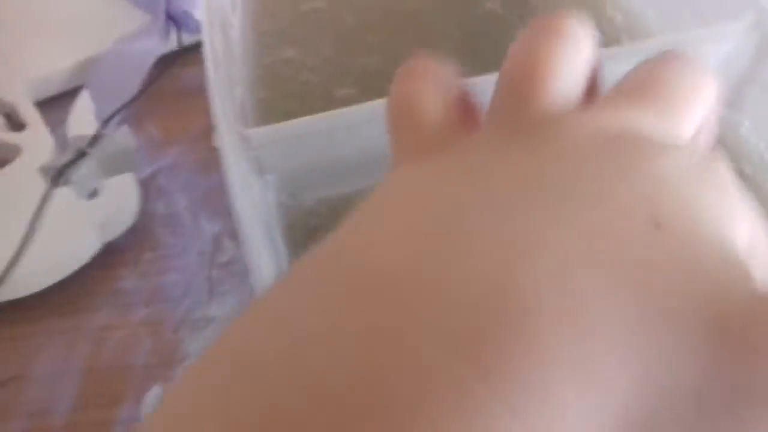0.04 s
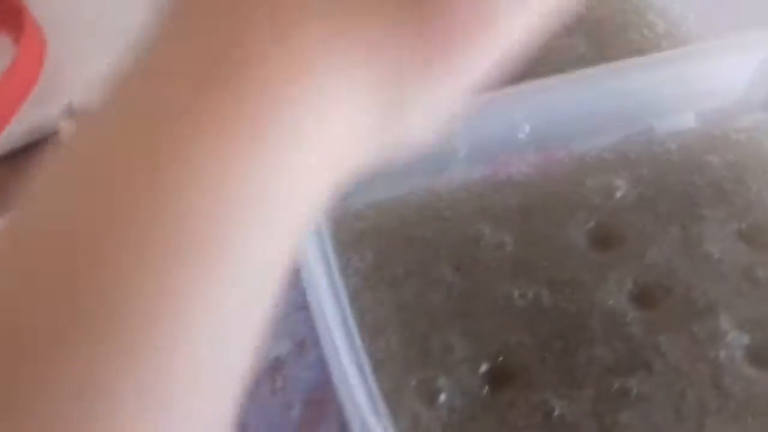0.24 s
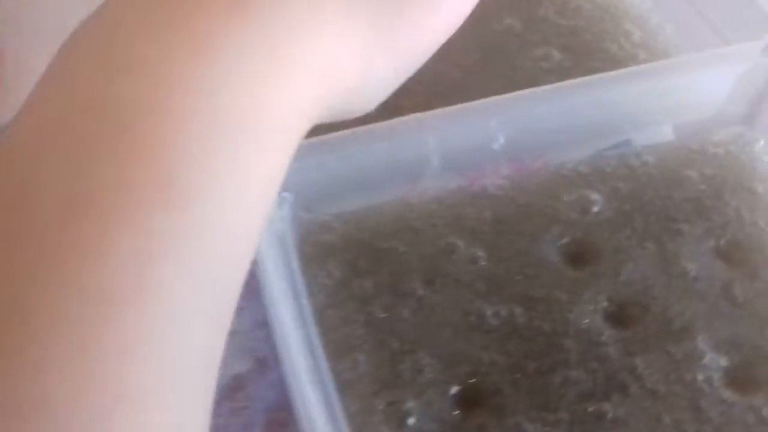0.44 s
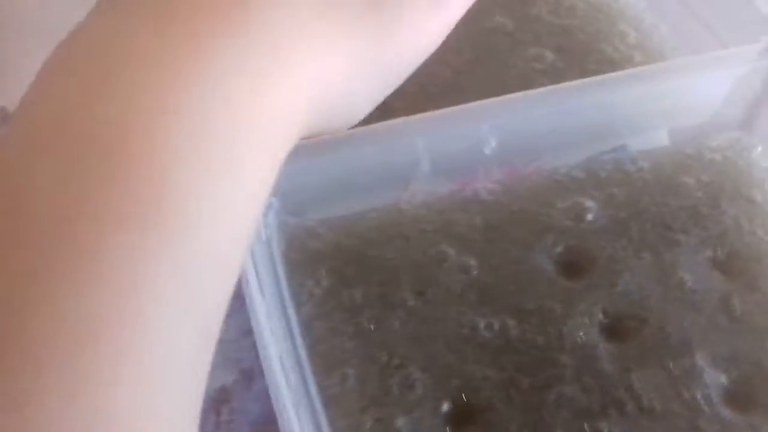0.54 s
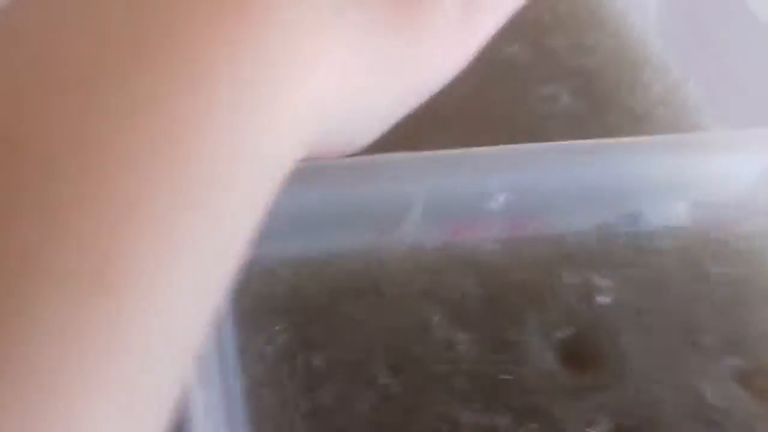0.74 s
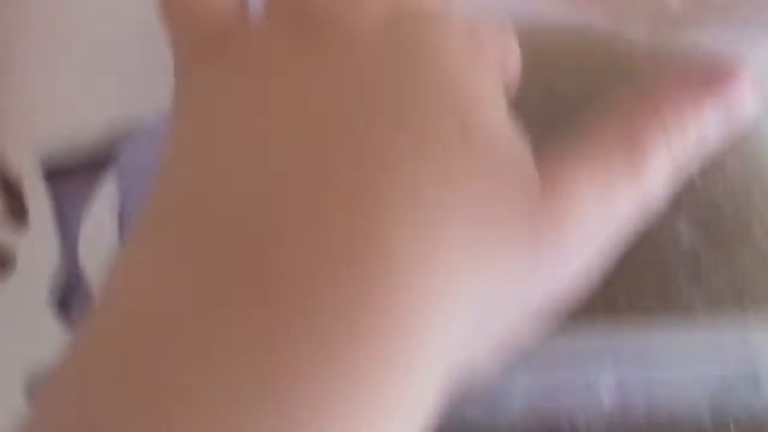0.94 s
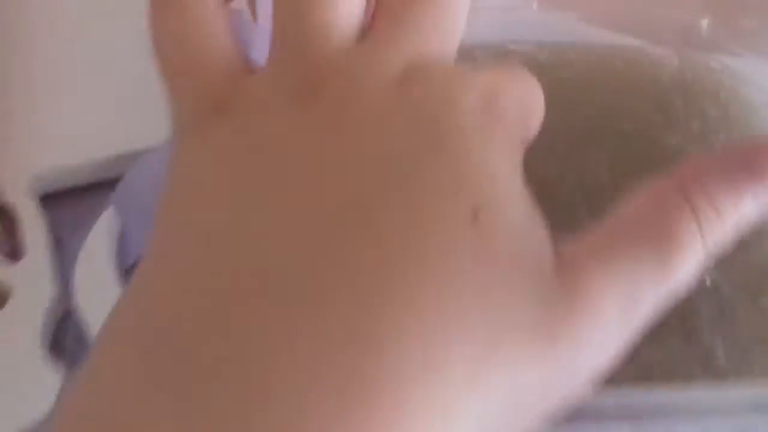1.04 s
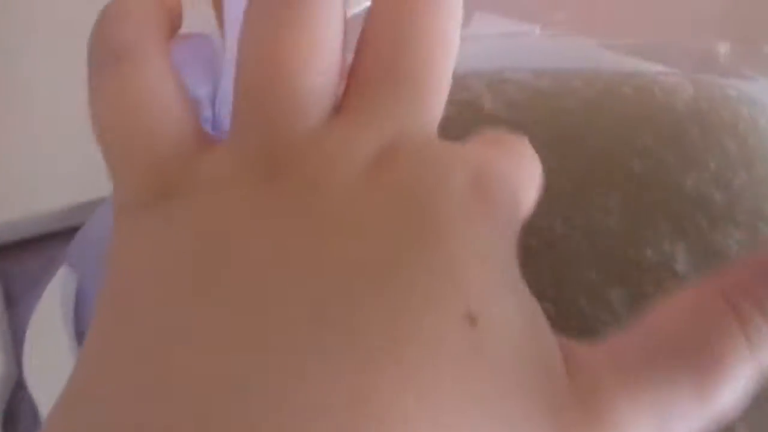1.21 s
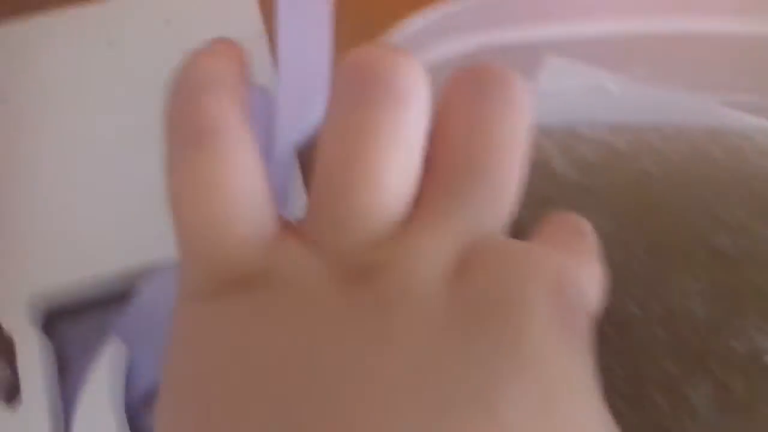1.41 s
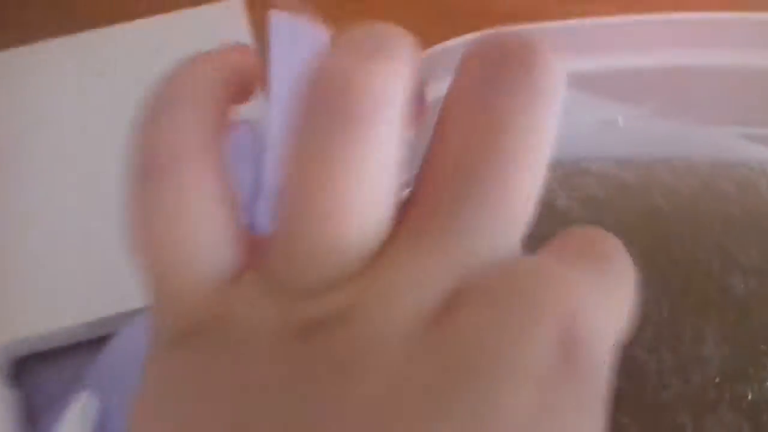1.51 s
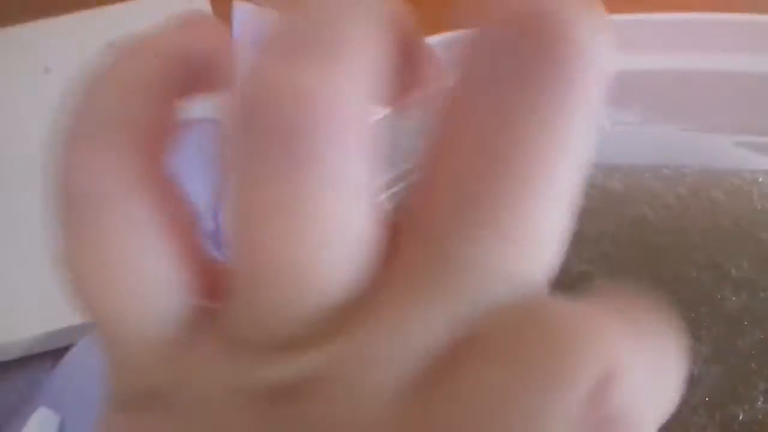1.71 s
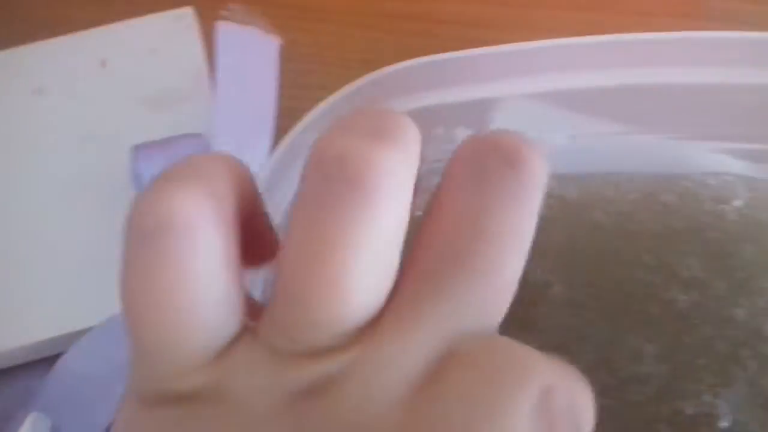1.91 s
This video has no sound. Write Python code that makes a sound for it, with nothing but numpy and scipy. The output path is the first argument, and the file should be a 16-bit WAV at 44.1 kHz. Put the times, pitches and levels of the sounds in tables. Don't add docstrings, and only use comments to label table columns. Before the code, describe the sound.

Slime poked in a plastic tub, very close and dry. Faint clicks at 0.13 s lead to one loud, bright wet snap at 0.17 s with a short hollow tub knock. Near-silence follows, only hiss and low room murmur, with tiny ticks around 1.1-1.4 s. A faint scrape swells near 1.55 s; softer pops and dull table knocks cluster at 1.59-1.69 s, then a weak scrape and faint thud near 1.86 s.

```python
import sys
import numpy as np
from scipy import signal
from scipy.fft import rfft, irfft
from scipy.io import wavfile
from scipy.ndimage import uniform_filter1d

SR = 44100
rng = np.random.default_rng(int(sys.argv[2]) if len(sys.argv) > 2 else 0)


def wav_record(signal):
    frames = np.transpose(np.atleast_2d(signal))
    bounded = np.clip(frames, -1, 1)
    quanta = np.round(bounded * 32767).astype(np.int16)
    wavfile.write(sys.argv[1], SR, quanta)


def voltage_ratio(decibels):
    exponent = np.asarray(decibels, float) / 20
    return 10 ** exponent


N = 85995

# (time [s], peak level [dB], pitch [Hz],
# t60 [s], crackle [dB re ring])
AIR_POPS = [(.134, -31, 2650, 0.0033, -13), (0.1347, -31.5, 4100, 0.005, -16),
            (0.1429, -26, 3220, 0.006, -29), (.143, -30.5, 4300, 0.0056, -16),
            (0.1438, -38, 2100, .01, 2.5), (0.1527, -43, 3560, 0.005, -19),
            (0.1593, -61, 2500, .012, 13.5), (.17, -9, 3000, .0055, -21), (.1714, -14, 2200, .005, -17),
            (0.1715, -23.5, 4600, .008, -8), (0.1722, -24.5, 1430, 0.011, 2.5),
            (.1745, -27, 4060, 0.0056, -1), (0.1917, -46, 3120, 0.0037, -6),
            (1.165, -51.5, 3840, 0.015, -7), (1.1744, -48.5, 2930, 0.0086, -2.5),
                (1.3905, -42.5, 1773, 0.015, -11), (1.3908, -42, 3360, 0.0083, -8.5),
                (1.5858, -28.5, 3200, 0.0052, -11), (1.5872, -33.5, 1450, 0.012, 2),
                (1.5927, -27, 4000, 0.0095, -31), (1.5936, -25.5, 3240, 0.0094, -1),
                (1.5993, -31, 3400, 0.003, -8), (1.6137, -32, 3900, 0.0047, -22),
                (1.6182, -45, 2500, 0.0044, 14), (1.619, -39, 4420, 0.0091, -1),
                (1.6265, -26.5, 1320, 0.0039, -8), (1.6294, -19, 2700, 0.003, -8),
                (1.6303, -29, 2050, 0.011, -6), (1.6326, -33, 3780, 0.011, -7),
                (1.6557, -21, 2290, 0.004, -8.5), (1.6562, -29, 4060, 0.0078, -2.5),
                (1.658, -35, 1960, 0.018, -21), (1.6605, -37.5, 2980, .012, -2),
                (1.7601, -55.5, 2200, .02, -9)]
# (time [s], level [dB], pitch [Hz])
THREAD_SNAPS = [(0.135, -50, 6500), (0.1435, -62, 6950), (0.171, -45.5, 11200), (0.1705, -41, 7000),
                (1.0995, -58, 6760), (1.1629, -56.5, 6900), (1.1741, -52, 6940), (1.332, -63, 13300),
                (1.3308, -55.5, 7400), (1.3305, -49, 3000), (1.5935, -45, 5550), (1.598, -49, 6900),
                (1.6134, -46.5, 5440), (1.616, -61, 10000), (1.62, -50.5, 6840), (1.601, -58, 5960),
                (1.6313, -59, 7950)]

# (time [s], level [dB], push length [s])
WALL_KNOCKS = [
    (.143, -58.5, 0.00038),
    (.1705, -29.5, 0.00025),
    (1.592, -49.5, 0.00021),
    (1.6294, -36.5, 0.00052),
    (1.656, -39.5, .0005),
    (1.846, -62, 0.0008),
]
# (frequency [Hz], level [dB], t60 [s])
WALL_MODES = [(176, -14.5, 0.083), (268, -11, 0.098), (311.8, -9.5, 0.12), (354, -1, 0.087),
              (468.3, -1.5, 0.064), (530, 0.5, 0.035), (637.4, -2, 0.048), (745, -10, 0.05),
              (1163, -8.5, 0.072)]
# (time [s], level [dB], push length [s])
TABLE_KNOCKS = [(1.225, -73, 0.0024), (1.535, -71, 0.0022), (1.614, -50.5, 0.0025), (1.619, -52.5, 0.0012),
                (1.6305, -39, 0.00072), (1.642, -56, 0.00059), (1.654, -53, 0.0017),
                (1.6645, -41.5, 0.0019), (1.676, -49.5, 0.00165), (1.686, -48, .0015),
                (1.868, -56.5, 0.0046)]
# (frequency [Hz], level [dB], t60 [s])
TABLE_MODES = [(134, -3, 0.125), (168.6, -3, 0.1), (225, 8, 0.056), (288, -11, 0.065), (346, -2, 0.12),
               (415, -3.5, 0.082), (612, -2.5, 0.035), (840, -3, 0.061), (1070, -8, 0.042)]
# (time [s], level [dB], push length [s])
SHOVES = [
    (.2, -60, 0.0039),
    (1.528, -53.5, 0.0098),
    (1.592, -47, 0.0066),
    (1.7, -59, 0.0073),
    (1.76, -66, 0.0044),
]
# (frequency [Hz], level [dB], t60 [s])
SWAY_MODES = [(77, 0.91, 0.12), (99, 0, 0.186)]

# (time [s], level [dB])
DRAG_EFFORT = [
    (1.36, -81),
    (1.46, -64.5),
    (1.519, -59.5),
    (1.555, -53),
    (1.572, -68),
    (1.73, -76.5),
    (1.8, -63.5),
    (1.855, -56),
    (1.93, -70),
]
# (frequency [Hz], bandwidth [Hz], level [dB])
DRAG_RESONANCES = [(290, 1040, 6.5), (1020, 330, -2), (1740, 320, 11.5), (2060, 230, 4.5), (2600, 570, 11),
                   (3330, 300, -20), (4000, 160, 2.5)]

# (frequency [Hz], bandwidth [Hz], level [dB], t60 [s])
ROOM_BANDS = [(300, 250, -31, 0.26), (800, 580, -38, 0.12), (1500, 1100, -40, 0.23),
              (2700, 3000, -41.5, .18), (4000, 1500, -37.5, 0.059), (6500, 3000, -30.5, 0.19)]
# (frequency [Hz], density [dB per Hz])
MURMUR_SPECTRUM = [(30, -13.5), (60, -21), (97, -2), (178, -2), (380, -5), (600, -6.5), (2000, -12),
                   (4200, -17.5)]
# (frequency [Hz], density [dB per Hz])
HISS_SPECTRUM = [(100, 9.5), (1500, 9), (5000, -3), (9200, -2.5), (10000, -12), (11000, -1.5),
                 (14300, -2.5), (15100, -6)]

POP_RISE_S, SNAP_T60_S = 0.0002, 0.004
SKIN_LOW_HZ, SKIN_TOP_HZ, POP_TOP_HZ = 1204, 4600, 4544
WALL_RISE_S, TABLE_RISE_S = 0.0024, 0.00092
DRAG_FLICKER_DB = 1.5
KNOCK_ROOM_DB = -10
MURMUR_DB, MURMUR_TOP_HZ, MURMUR_SWELL_DB = -68, 4030, -0.5
HISS_DB, HISS_SIDE_DB = -73.5, 1.5
WIDTH_DB, MIC_LOW_HZ = -25.5, 76.7


def pops():
    out = np.zeros(N)
    t = np.arange(3000) / SR
    skin = signal.butter(2, [SKIN_LOW_HZ, SKIN_TOP_HZ], "band", fs=SR, output="sos")
    for s, db, hz, t60, crackle_db in AIR_POPS:
        fade = (1 - np.exp(-t / POP_RISE_S)) * voltage_ratio(-60 * t / t60)
        crackle = unit(signal.sosfilt(skin, rng.standard_normal(len(t)))) * fade ** 0.77
        sagging_time = t * (1 - 12 * np.minimum(t, 0.004))
        ring = np.sin(2 * np.pi * hz * sagging_time) * fade
        add(out, s, voltage_ratio(db) * (ring + voltage_ratio(crackle_db) * crackle))
    return signal.sosfilt(signal.butter(6, POP_TOP_HZ, fs=SR, output="sos"), out)


def snaps():
    out = np.zeros(N)
    t = np.arange(3000) / SR
    for s, db, hz in THREAD_SNAPS:
        burst = band(band(rng.standard_normal(len(t)), hz, hz / 2), hz, hz / 2)
        add(out, s, voltage_ratio(db - 60 * t / SNAP_T60_S) * unit(burst))
    return out


def knocks(blows, modes, rise_s, alternate=True):
    out = np.zeros(N)
    t = np.arange(12000) / SR
    for s, db, push_s in blows:
        luck = rng.standard_normal((len(modes), 2))
        ring = np.zeros(len(t))
        for k, (hz, mode_db, t60) in enumerate(modes):
            sign = -1 if alternate and k % 2 else 1
            level = voltage_ratio(mode_db + 1.5 * luck[k, 0] - 60 * t / t60)
            pitch = hz * (1 + 0.008 * luck[k, 1])
            ring += sign * level * np.sin(2 * np.pi * pitch * t)
        ring *= 1 - np.exp(-t / rise_s)
        push = np.hanning(int(push_s * SR) + 3)
        add(out, s, voltage_ratio(db) * np.convolve(ring, push / push.sum()))
    return out


def drag():
    grains = rng.standard_normal(N) * voltage_ratio(2.8 * rng.exponential(size=N))
    tub = np.zeros(N)
    for hz, width, db in DRAG_RESONANCES:
        tub += voltage_ratio(db) * unit(band(band(grains, hz, width), hz, width * 1.1))
    times, levels = np.array(DRAG_EFFORT).T
    effort_db = np.interp(np.arange(N) / SR, times, levels, left=-120)
    return unit(tub) * voltage_ratio(effort_db + DRAG_FLICKER_DB * walk(60))


def room(x):
    t = np.arange(14000) / SR
    answer = np.zeros(len(t))
    for hz, width, db, t60 in ROOM_BANDS:
        answer += unit(band(rng.standard_normal(len(t)), hz, width)) * voltage_ratio(db - 60 * t / t60)
    onset = np.minimum(t / 0.001, 1)
    return signal.fftconvolve(x, answer * onset * 0.2)[:N]


def room_murmur():
    top = signal.butter(8, MURMUR_TOP_HZ, fs=SR, output="sos")
    noise = signal.sosfilt(top, coloured(MURMUR_SPECTRUM, 0.5))
    return noise * voltage_ratio(MURMUR_DB + MURMUR_SWELL_DB * walk(2.29))


def mic_hiss(db, flicker_db):
    return voltage_ratio(db) * coloured(HISS_SPECTRUM, flicker_db)


def unit(x):
    return x / np.sqrt(np.mean(x ** 2))


def band(x, hz, width):
    return signal.lfilter(*signal.iirpeak(min(hz, 0.45 * SR), hz / width, fs=SR), x)


def walk(rate):
    hold = int(SR / rate)
    steps = np.repeat(rng.standard_normal(N // hold + 1), hold)
    return 1.3 * uniform_filter1d(uniform_filter1d(steps, hold), hold)[:N]


def add(out, s, x):
    i = int(s * SR)
    out[i:i + len(x)] += x[:len(out) - i]


def coloured(spectrum, flicker_db):
    hz, db = np.array(spectrum).T
    f = np.fft.rfftfreq(N, 1 / SR)[1:]
    bins = rfft(rng.standard_normal(N))[1:] * voltage_ratio(np.interp(np.log(f), np.log(hz), db))
    out = np.zeros(N)
    for k in range(10):
        octave = np.clip(1 - np.abs(np.log2(f / 30) - k), 0, 1)
        out += irfft(np.r_[0, bins * octave], N) * voltage_ratio(flicker_db * walk(4.97))
    return unit(out)


def scene():
    slime = pops() + snaps()
    body = knocks(WALL_KNOCKS, WALL_MODES, WALL_RISE_S)
    body += knocks(TABLE_KNOCKS, TABLE_MODES, TABLE_RISE_S, alternate=False)
    body += knocks(SHOVES, SWAY_MODES, WALL_RISE_S)
    low_cut = signal.butter(6, MIC_LOW_HZ, "high", fs=SR, output="sos")
    near = signal.sosfilt(low_cut, slime + body)
    to_room = slime + voltage_ratio(KNOCK_ROOM_DB) * body
    mid_echo = signal.sosfilt(low_cut, room(to_room))
    side_echo = signal.sosfilt(low_cut, room(to_room))
    mid = near + mid_echo + drag() + room_murmur() + mic_hiss(HISS_DB, 0.39)
    side = voltage_ratio(WIDTH_DB) * (0.1 * near + 1.1 * side_echo) + mic_hiss(HISS_DB + HISS_SIDE_DB, 0.3)
    return np.array([mid + side, mid - side])


def top_cut(x):
    return signal.sosfilt(signal.butter(12, 15830, fs=SR, output="sos"), x)


def record(dry):
    mix = dry - 0.0005
    return top_cut(mix)


dry = scene()
out = record(dry)
wav_record(out)
```